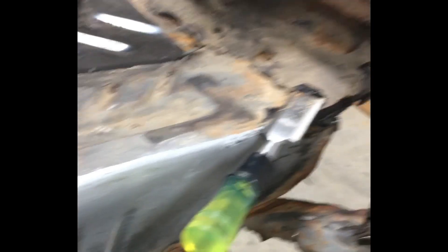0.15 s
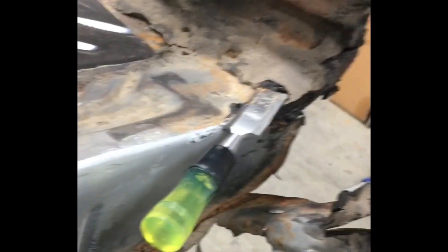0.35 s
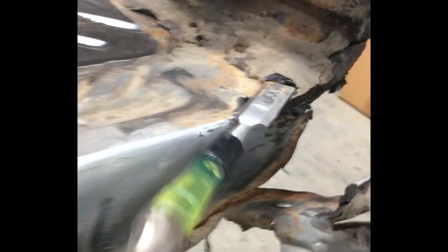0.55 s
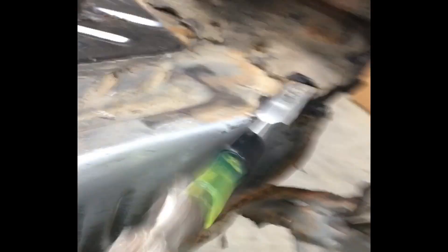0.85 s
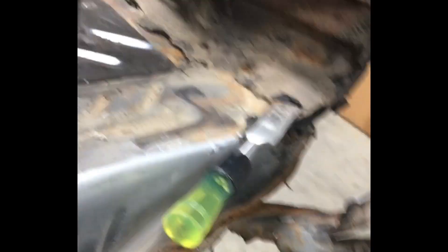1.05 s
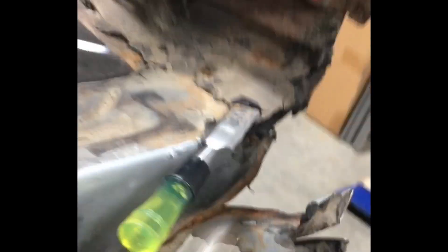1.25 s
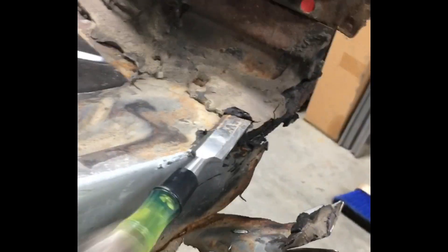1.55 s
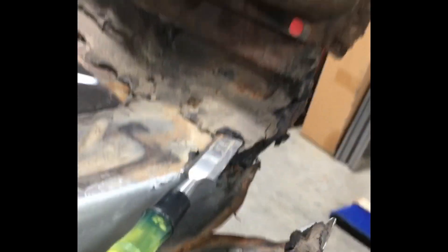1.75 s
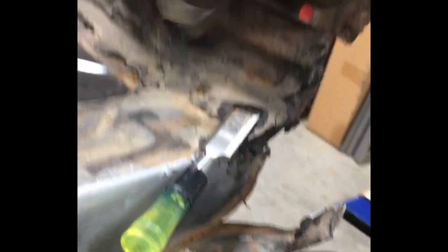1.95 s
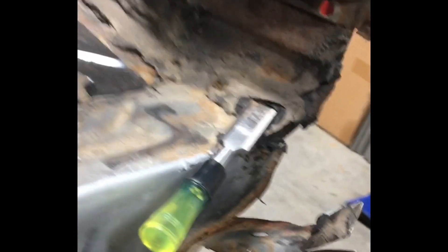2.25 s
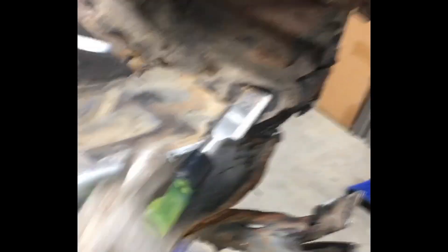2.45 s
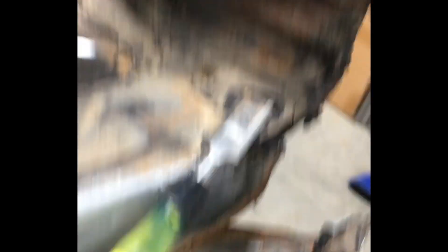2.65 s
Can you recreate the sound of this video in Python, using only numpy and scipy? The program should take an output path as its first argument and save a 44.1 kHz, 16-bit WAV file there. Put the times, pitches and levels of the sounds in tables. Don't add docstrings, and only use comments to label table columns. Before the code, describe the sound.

A hammer drives a chisel into rusted car body metal: about nine loud cracking, clanging blows, roughly three a second, with low panel boom, the last ringing out in a garage, close to a phone microphone.

```python
import sys
import numpy as np
from scipy import signal
from scipy.fft import rfft, irfft, next_fast_len
from scipy.io import wavfile
from scipy.ndimage import uniform_filter1d, minimum_filter1d

SR = 44100
rng = np.random.default_rng(int(sys.argv[2]) if len(sys.argv) > 2 else 0)


def field_ratio(decibels):
    return 10 ** (np.asarray(decibels, dtype=float) / 20)


def wrap_up_sound(samples):
    columns = np.atleast_2d(samples).T
    tamed = np.clip(columns, -1, 1)
    steps = np.round(tamed * 32767).astype(np.int16)
    wavfile.write(sys.argv[1], SR, steps)


N = 123479
LEAD_S = 0.4
T_S = np.arange(SR // 3) / SR


def unit(x):
    return x / np.sqrt(np.mean(x ** 2) + 1e-20)


def along(points, hz):
    f, v = np.transpose(points)
    return np.interp(np.log(hz + 1), np.log(f + 1), v)


def noise(spectrum, size):
    m = next_fast_len(size)
    gain = field_ratio(along(spectrum, np.fft.rfftfreq(m, 1 / SR)))
    return unit(irfft(rfft(rng.standard_normal(m)) * gain, m)[:size])


def dying(spectrum, t60s, size, lift_db, level_at_s):
    hz, frames_s, z = signal.stft(noise(spectrum, size), SR, nperseg=256)
    t60_s = np.maximum(along(t60s, hz), 0.05)[:, None]
    gain_db = 60 * (level_at_s - frames_s) / t60_s + lift_db(hz + 1)[:, None]
    return signal.istft(z * field_ratio(gain_db), SR, nperseg=256)[1][:size]


def add(out, s, sound):
    part = out[round((s + LEAD_S) * SR):][:len(sound)]
    part += sound[:len(part)]


def bank(hz, t60_s):
    rise_s = 0.00069 + 1.2 / hz[:, None]
    shape = field_ratio(-60 * T_S / t60_s[:, None]) * (1 - np.exp(-T_S / rise_s)) ** 2
    phase = 2 * np.pi * hz[:, None] * T_S
    return np.vstack([shape * np.sin(phase), shape * np.cos(phase)])


def blows():
    # (time [s], strength [dB], boom over it [dB], crack over it [dB], mid clang over it [dB])
    strokes = [
        (0.203, -4, 1, 3, 0.5),
        (0.481, -3, -3.5, 3, 0),
        (0.773, -4.5, -1.5, 2, 4),
        (1.066, -13.5, -8.5, -5, 6.5),
        (1.445, -2.5, 0, 3.5, -2),
        (1.764, -3.5, -8.5, 1.5, 2),
        (2.024, -20.5, -2.5, -4, 4.5),
        (2.073, -5, -3, 5.5, 3),
        (2.385, -4.5, 2, 6, -0.5),
    ]
    earlier = (-0.12, -11, 0, -10, 0)
    out = np.zeros(N + SR)
    shell = shell_modes()
    for s, db, boom_db, crack_db, body_db in [earlier, *strokes]:
        def tilt_db(hz):
            low = boom_db / (1 + (hz / 400) ** 3)
            high = crack_db / (1 + (3040 / hz) ** 3)
            return low + high + body_db * np.exp(-np.log2(hz / 1640) ** 2)

        hit = shell_clang(shell, tilt_db) + panel_boom(tilt_db)
        hit += field_ratio(crack_db) * (chisel_ring() + rust_sizzle() + crack_and_bounce())
        add(out, s, field_ratio(db) * hit * np.minimum((T_S[-1] - T_S) / 0.08, 1))
        add(out, s, field_ratio(db) * garage_tail(tilt_db))
    return out


def shell_modes():
    # (frequency [Hz], density [dB per Hz])
    spectrum = [(29, -54.5), (50, -10), (277, 1.5), (567, -5), (1080, -1), (1270, -6), (1570, -2.5),
                (2660, -28.5), (4500, -30.5), (5850, -55), (9900, -120)]
    # (frequency [Hz], T60 [s])
    t60s = [(60, 0.54), (300, 0.32), (1000, 0.22), (2000, 0.21), (4500, 0.19)]
    hz = np.geomspace(50, 4500, num=280) * np.exp(0.008 * rng.standard_normal(280))
    modes = bank(hz, along(t60s, hz) * np.exp(0.2 * rng.standard_normal(len(hz))))
    weight = np.tile(field_ratio(along(spectrum, hz)) * np.sqrt(hz), 2)
    weight /= np.linalg.norm(weight) / np.sqrt(2)
    return hz, weight, modes


def shell_clang(shell, tilt_db):
    hz, weight, modes = shell
    return (rng.standard_normal(len(weight)) * weight * field_ratio(np.tile(tilt_db(hz), 2))) @ modes


def panel_boom(tilt_db):
    # (frequency [Hz], level [dB], T60 [s])
    panels = [(62.7, -8, 0.25), (131.8, -4, 0.24), (147.7, -11, 0.35), (212.4, -13.5, 0.31),
              (258.1, -1.5, 0.38), (321.7, -11.5, 0.67), (423.6, -13.5, 0.48), (461, -5.5, 0.24),
              (515, -16, 0.38), (658.4, -13, 0.41), (725.5, -11, 0.46), (876, -12, 0.13), (1057, -6, 0.12),
              (1566.6, -1, 0.067)]
    level_db, scatter_db, rough_rad = -3.5, 2, 0.3
    hz, db, t60_s = np.transpose(panels)
    sines, cosines = bank(hz, t60_s).reshape(2, len(hz), -1)
    lean_db = tilt_db(hz) + scatter_db * rng.standard_normal(len(hz))
    knots = np.cumsum(rng.standard_normal((len(hz), 20)), axis=1) * rough_rad
    knots_s = np.linspace(0, T_S[-1], num=20)
    wander = np.array([np.interp(T_S, knots_s, row) for row in knots])
    return field_ratio(level_db + db + lean_db) @ (sines * np.cos(wander) + cosines * np.sin(wander))


def chisel_ring():
    # (frequency [Hz], level [dB], T60 [s])
    modes = [(2600, -49.5, 0.15), (3536, 1.5, 0.17), (3832, 3, 0.14), (4420, -8, 5.0), (5560, -3.5, 0.1),
             (5890, 8, 0.02), (8764, -7, 1.1)]
    level_db, t60_max_s, scatter_db = -21, 0.045, 4.1
    hz, db, t60_s = np.transpose(modes)
    decay = field_ratio(-60 * T_S / np.minimum(t60_s, t60_max_s)[:, None])
    rows = decay * np.sin(2 * np.pi * hz[:, None] * T_S)
    return field_ratio(level_db + db + scatter_db * rng.standard_normal(len(hz))) @ rows


def rust_sizzle():
    # (frequency [Hz], density [dB per Hz])
    spectrum = [(1180, -3.5), (2000, -2.5), (5630, -14.5), (7800, -21.5), (8970, -21), (14200, -35),
                (16300, -40)]
    # (frequency [Hz], T60 [s])
    t60s = [(2000, 0.21), (5000, 0.19), (10000, 0.17), (16000, 0.24)]
    level_db, rise_s, grit_db = -9.5, 0.0015, 2
    sizzle = field_ratio(level_db) * dying(spectrum, t60s, len(T_S), np.zeros_like, 0)
    grit = np.interp(T_S, np.linspace(0, T_S[-1], num=90), rng.standard_normal(90))
    return sizzle * np.minimum(T_S / rise_s, 1) * field_ratio(grit_db * grit)


def crack_and_bounce():
    # (frequency [Hz], density [dB per Hz])
    spectrum = [(350, -10), (600, 8.5), (1950, 6), (6000, -9), (12300, -19), (15200, -20.5), (16500, -38.5)]
    crack_db, crack_t60_s = 1.5, 0.03
    snap_db, snap_t60_s, rise_s = 3.5, 0.012, 0.0009
    bounce_db, bounce_s, bounce_t60_s = -21, 0.031, 0.02
    burst = field_ratio(crack_db - 60 * T_S / crack_t60_s) + field_ratio(snap_db - 60 * T_S / snap_t60_s)
    burst *= 1 - np.exp(-T_S / rise_s)
    since_s = T_S - bounce_s * np.exp(0.072 * rng.standard_normal())
    bounce = field_ratio(bounce_db - 60 * abs(since_s) / bounce_t60_s) * (since_s > 0)
    return (burst + bounce) * noise(spectrum, len(T_S))


def single_rings():
    # (time [s], pitch [Hz])
    ring_at = [
        (1.067, 1550),
        (1.067, 2100),
        (1.07, 260),
        (1.07, 730),
        (1.765, 1620),
        (1.765, 2050),
        (1.447, 1070),
    ]
    # (level [dB], T60 [s])
    ring_decay = [(-15, 0.071), (-15, 0.069), (-20, 0.53), (-23.5, 0.23), (-3, 0.09), (-8, 0.098),
                  (-9, 0.13)]
    # (time [s], pitch [Hz], level [dB], T60 [s])
    knocks = [
        (2.0245, 1180, -8, .022),
        (2.108, 9250, -35, .17),
        (2.115, 8500, -38, .19),
        (.235, 9000, -36, .04),
        (2.05, 6600, -42, .02),
    ]
    rise_s, rough_rad = 0.00067, 0.05
    out = np.zeros(N + SR)
    rings = [(*at, *decay) for at, decay in zip(ring_at, ring_decay)]
    for s, hz, db, t60_s in [*rings, *knocks]:
        wander = rough_rad * hz / 9000 * np.cumsum(rng.standard_normal(len(T_S)))
        shape = field_ratio(db - 60 * T_S / t60_s) * np.minimum(T_S / rise_s, 1)
        add(out, s, shape * np.sin(2 * np.pi * hz * T_S + wander))
    return out


def flakes():
    # (time [s], level [dB], length [s])
    puffs = [(0.102, -67, 0.011), (0.116, -66, 0.028), (0.179, -53.5, .02), (0.658, -66, .012),
             (0.802, -35, 0.0072), (0.939, -63, 0.013), (1.094, -48, .005), (1.30, -71, 0.019),
             (1.418, -58, 0.025), (1.733, -56, 0.016), (2.0234, -40, 0.0072), (2.034, -50, .005),
             (2.052, -56, .006), (2.269, -64, .012), (2.768, -77, 0.014)]
    # (frequency [Hz], level [dB])
    spectrum = [(1500, -26), (3500, 5), (8000, -13), (13000, -9.5), (15500, -11.5), (16500, -38)]
    out = np.zeros(N + SR)
    for s, db, length_s in puffs:
        grit_db = 6.1 * rng.standard_normal(len(T_S) // 40 + 1).repeat(40)[:len(T_S)]
        shape = np.minimum(T_S / 0.003, 1) / (1 + (T_S / length_s) ** 4)
        add(out, s, field_ratio(db) * shape * field_ratio(grit_db) * noise(spectrum, len(T_S)))
    return out


def squeal():
    # (time [s], frequency [Hz], level [dB])
    glide = [
        (1.62, 10850, -86),
        (1.645, 11400, -79),
        (1.69, 11700, -83),
        (1.72, 11500, -76),
        (1.745, 11260, -80),
    ]
    # (frequency ratio, level [dB])
    partials = [(.835, -1), (1, 1), (1.046, 1), (1.16, -7), (1.215, -11)]
    s, hz, db = np.transpose(glide)
    t = np.arange(N) / SR
    phase = 2 * np.pi * np.cumsum(np.interp(t, s, hz)) / SR
    out = np.zeros(N)
    for ratio, part_db in partials:
        flicker_db = 8 * np.interp(t, np.arange(200) / 60, rng.standard_normal(200))
        out += field_ratio(part_db + flicker_db) * np.sin(ratio * phase)
    return field_ratio(np.interp(t, s, db, left=-150, right=-150)) * out


def garage_tail(tilt_db):
    # (frequency [Hz], density [dB per Hz])
    spectrum = [(24, -43), (60, -7.5), (260, -4), (500, -9.5), (720, -10), (1600, -14.5), (3000, -31.5),
                (16000, -74)]
    # (frequency [Hz], T60 [s])
    t60s = [(60, 4.8), (300, 2.77), (1500, 1.83), (3000, 1.47), (7000, 0.63), (15000, 0.66)]
    level_db, rise_s, follows = -27, 0.004, 0.81
    t = np.arange(SR * 5 // 4) / SR
    tail = dying(spectrum, t60s, len(t), lambda hz: follows * tilt_db(hz), 0.22)
    return field_ratio(level_db) * tail * (1 - np.exp(-t / rise_s))


def scene():
    hiss_db = -81.5
    near = (blows() + single_rings() + flakes())[round(LEAD_S * SR):][:N]
    return (near + squeal() + field_ratio(hiss_db) * rng.standard_normal(N))[None]


def roll_off(x):
    return signal.sosfilt(signal.butter(12, 16750, fs=SR, output="sos"), x)


def record(dry):
    hold_s, drive, limit, hardness = 0.0062, 1.236, 1.05, 4.5
    low_cut_hz, top_hz = 45, 15900
    size = round(hold_s * SR) + 1
    need = np.minimum(1, drive * limit / (abs(dry) + 1e-9))
    lowest = minimum_filter1d(need, size=size, axis=1)
    held = dry * uniform_filter1d(lowest, size=size, axis=1)
    held = held / (1 + abs(held / limit) ** hardness) ** (1 / hardness)
    m = next_fast_len(N + 8192)
    hz = np.fft.rfftfreq(m, 1 / SR)
    response = 1j * hz / (low_cut_hz + 1j * hz) / (1 + (hz / top_hz) ** 160)
    mix = irfft(rfft(held, m) * response, m)[:, :N]
    return roll_off(mix)


dry = scene()
out = record(dry)
wrap_up_sound(out)
```